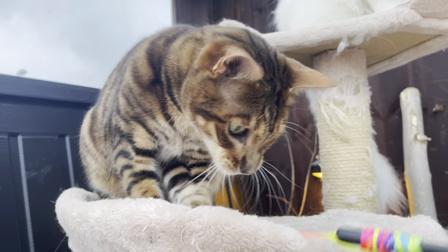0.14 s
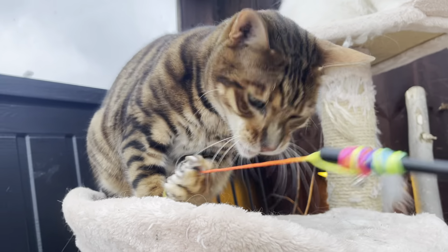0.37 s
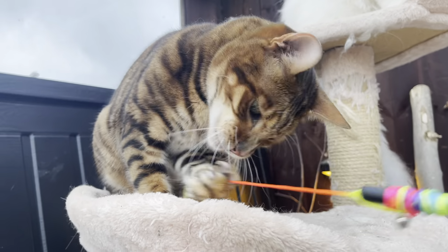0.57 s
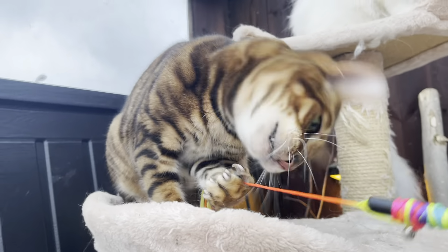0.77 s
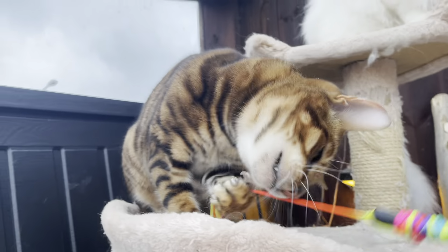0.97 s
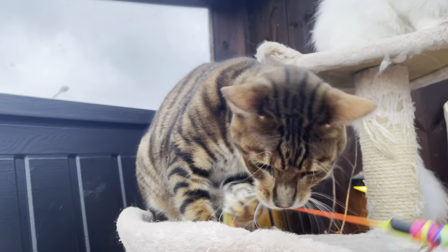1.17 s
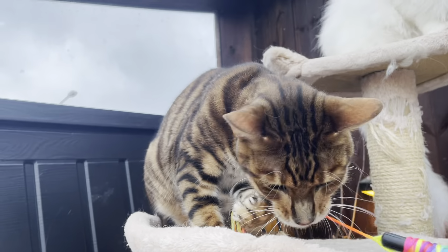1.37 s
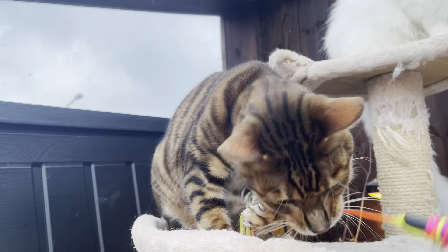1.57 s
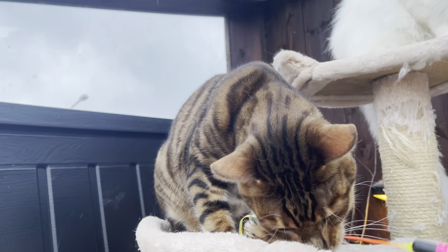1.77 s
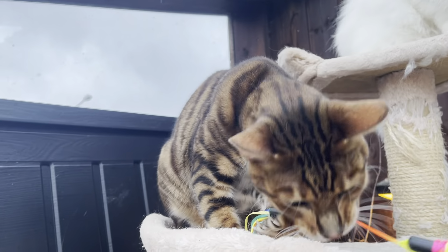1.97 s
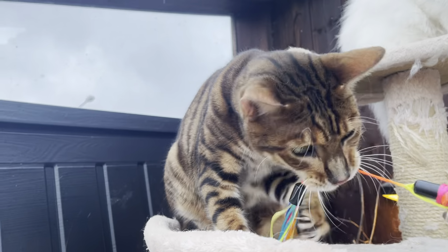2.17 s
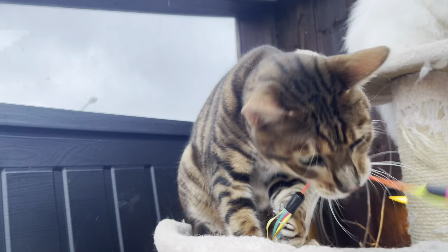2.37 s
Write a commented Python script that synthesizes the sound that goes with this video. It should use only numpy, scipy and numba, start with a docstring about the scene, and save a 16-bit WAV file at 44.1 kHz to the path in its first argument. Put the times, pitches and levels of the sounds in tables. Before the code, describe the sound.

A small jingle bell on a cat toy, close and outdoors. Only quiet traffic wash, low hum and faint hiss until about 0.2 s, when a soft paw rustle brings the first weak tinkles. From 0.43 s bright, irregular, rapid metallic jingling runs to the end at 2.4 s, with sharp clicks near 0.53 and 2.1 s and a faint dull thump at 0.6 s. Very high ringing, short shimmering tails, no obvious echo.

```python
"""Distant traffic with a low hum and a faint narrow hiss is heard first, a broad wash of filtered noise. Then a
small jingle bell on a cat's wand toy is shaken close to a phone outdoors: its loose pellet knocks and rolls
inside the shell, driving decaying resonators (clear modes) and decaying noise (a bright shimmer). Short noise
bursts add dry cracks as the bell snaps against the wand; a soft rustle and one dull thump come from a paw
grabbing the toy."""
import sys
import numpy as np
from scipy import signal
from scipy.fft import rfft, irfft
from scipy.io import wavfile
from scipy.ndimage import uniform_filter1d
from numba import njit

SR = 44100
rng = np.random.default_rng(int(sys.argv[2]) if len(sys.argv) > 2 else 0)


def bounce(signal):
    """Save signal as a 16-bit WAV file at the path given by the first command-line argument."""
    frames = np.transpose(np.atleast_2d(signal))
    limited = np.clip(frames, -1, 1)
    pcm = np.round(limited * 32767).astype(np.int16)
    wavfile.write(sys.argv[1], SR, pcm)


N = 107471

# pellet knocks, drives before the gains of modes and shimmer:
# (time [s], shimmer and high modes [dB], lower modes [dB], upper modes [dB])
KNOCKS = [(0.1252, -48.5, -80, -60), (0.1927, -48.5, -77, -65), (0.2281, -32, -41, -54),
          (0.26, -34.5, -43, -36.5), (0.2875, -25, -36, -45), (0.295, -23, -35, -46),
          (0.3259, -42, -47, -55), (0.3327, -29, -40, -54), (0.3416, -20, -32, -35),
          (0.3515, -42, -58, -37), (0.4076, -37, -43, -60), (0.4277, -11.5, -23, -44),
          (0.4351, -16, -17, -41), (0.4378, -28, -27, -40), (0.4462, -19.5, -32, -41),
          (0.453, -28, -32, -46), (0.4763, -30, -39, -55), (0.4826, -18.5, -37, -50),
          (0.4877, -18.5, -32, -34), (0.4923, -21, -31.5, -40), (0.502, -37, -24.5, -42),
          (0.5229, -32, -33, -29), (0.5274, -11, -30.5, -31), (0.5322, -23, -32, -42),
          (0.5381, -24, -43, -45), (0.5585, -25, -33, -34), (0.571, -13.5, -26.5, -40),
          (0.579, -21, -27, -48), (0.6071, -21.5, -35, -45), (0.6117, -16, -51, -39),
          (0.6145, -27, -32.5, -38), (0.6509, -25, -46, -33), (0.6567, -28, -45, -27),
          (0.6691, -25, -39, -30.5), (0.6756, -29, -34, -42), (0.7094, -23.5, -29, -42),
          (0.7578, -31, -53, -37.5), (0.775, -26, -32, -42), (0.7846, -25, -38, -37),
          (0.7911, -37, -42, -54), (0.8327, -19, -78, -35.5), (0.895, -33, -56, -43),
          (0.903, -21, -29, -33), (0.9145, -17.5, -28.5, -23.5), (0.9204, -38, -41, -52),
          (0.9688, -20.5, -33.5, -31.5), (0.9833, -24, -44, -44), (1.0249, -25.5, -67, -47),
          (1.0694, -29, -59, -46), (1.075, -27.5, -45, -33), (1.081, -31, -56, -34),
          (1.0865, -23.5, -40, -45), (1.1416, -24, -36, -31), (1.1599, -21, -45, -29.5),
          (1.1843, -33, -51, -43), (1.196, -23, -58, -28), (1.202, -24, -58, -37),
          (1.2704, -23.5, -33.5, -44), (1.277, -24, -40, -35), (1.2829, -23, -53, -29.5),
          (1.3153, -26.5, -49, -53), (1.3269, -24, -53, -35), (1.3328, -20.5, -57, -34),
          (1.383, -25, -41, -41), (1.3875, -22, -32.5, -31), (1.437, -39, -41, -37),
          (1.4426, -20.5, -39, -31), (1.4909, -50, -54, -38), (1.4978, -24, -33, -33),
          (1.5159, -25.5, -55, -42), (1.536, -25.5, -54, -58), (1.5624, -20, -34, -29.5),
          (1.57, -26, -42, -43), (1.632, -17, -19.5, -32), (1.6367, -21.5, -28, -23),
          (1.6604, -37, -35, -47), (1.67, -35, -39, -41), (1.6804, -24.5, -34, -29),
          (1.7092, -35, -45, -40), (1.7472, -22, -34, -44), (1.753, -23, -28, -29), (1.7981, -30, -50, -34),
          (1.8117, -26, -47, -29), (1.8512, -40, -35.5, -33.5), (1.867, -26.5, -35, -39),
          (1.8736, -22, -36, -61), (1.913, -44, -44, -33.5), (1.9194, -24, -36, -33.5),
          (1.9322, -32, -40, -39), (1.9398, -29.5, -35.5, -44), (1.9956, -20.5, -29.5, -40),
          (2.0046, -18.5, -27.5, -30), (2.028, -28, -44, -31), (2.0413, -22.5, -40, -37),
          (2.1012, -7.5, -29, -22), (2.1482, -24.5, -34, -44), (2.151, -24, -46, -20.5),
          (2.1552, -26, -31, -39), (2.1749, -24, -31.5, -48), (2.1924, -25.5, -29, -46),
          (2.201, -18, -31.5, -34), (2.2482, -28.5, -33.5, -32), (2.2678, -29.5, -52, -54),
          (2.2892, -26, -33.5, -48), (2.2957, -30, -41, -36), (2.3342, -21, -30.5, -27.5),
          (2.3507, -34, -42, -37), (2.363, -24.5, -35, -39), (2.4065, -30, -38, -42),
          (2.419, -26, -54, -51), (2.4311, -22, -35, -44)]


def bell():
    """Superposition: one train of impacts excites the modes and the shimmer; dry cracks add on top."""
    rows = np.array(KNOCKS)
    at = np.clip((rows[:, 0] * SR).astype(int), 0, N - 1)
    taps = rolling(at, rows[:, 1])
    return clear_modes(rows, at, taps) + shimmer(rows, at, taps) + cracks()


# how hard the pellet rolls between knocks: (time [s], level [dB])
ROLL = [(0.18, -59), (0.24, -55), (0.4, -51.5), (0.46, -55), (0.51, -47), (0.68, -42), (0.82, -52),
        (0.9, -42), (1.14, -40), (1.43, -42.5), (2.06, -41.5), (2.37, -50.5), (2.43, -30.5)]
TAPS_PER_S, TAP_SPREAD_DB = 650, 5.5
BOUNCE_DB, BOUNCE_T60_S = -14, 0.079  # small rebounds, relative to their knock
FLIGHT_S, FLIGHT_DB = .026, -0.4  # change of rolling before a knock, per dB of knock above the rolling


def rolling(at, knock_db):
    """Random impact process: taps of steady rolling, weaker in flight before a knock, and rebounds after it."""
    t = np.arange(N) / SR
    roll_db = read(ROLL, t)
    following = np.clip(np.searchsorted(at, np.arange(N)), 0, len(at) - 1)
    in_flight = at[following] - np.arange(N) < FLIGHT_S * SR
    excess_db = np.clip(knock_db[following] - roll_db, 0, 30)
    roll_power = undb(2 * (roll_db + FLIGHT_DB * in_flight * excess_db)) * (t > ROLL[0][0])

    knock_power = np.zeros(N)
    knock_power[at] = undb(knock_db) ** 2
    bounce_power = undb(2 * BOUNCE_DB) * decay(knock_power, BOUNCE_T60_S / 2)  # power falls twice as fast in dB
    level = np.sqrt(roll_power + bounce_power)

    tapped = rng.random(N) < TAPS_PER_S / SR
    tap_db = TAP_SPREAD_DB * (np.minimum(rng.exponential(size=N), 2.8) - 2)
    return tapped * level * undb(tap_db)


# resonances of the shell, levels relative to their drive: (frequency [Hz], level [dB], t60 [s])
LOWER = [(7840, -20, 0.21), (7883, -2.5, 0.066), (7878, -14, 0.15)]
UPPER = [(8384, -1.5, 0.082), (8364, -13, 0.042)]
HIGH = [(8830, -33, 0.066), (10800, -31.5, 0.18), (11216, -35.5, 0.026), (11460, -25.5, 0.065)]
ROLL_RING_DB = -3  # tap strength in the modes
DETUNE, MODE_SCATTER_DB = 0.002, 2.5  # standard deviations: pitch as a fraction, and level, per knock
RING_LEFT = 0.15  # share of the old ring's amplitude that a knock leaves
RING_BAND_HZ = 7250, 11900


def clear_modes(rows, at, taps):
    """Modal synthesis: each natural frequency of the shell rings and decays after every impact."""
    last = np.clip(np.searchsorted(at, np.arange(N), side="right") - 1, 0, None)  # latest knock
    rings = np.zeros(N)
    for column, family in ((2, LOWER), (3, UPPER), (1, HIGH)):
        for hz, db, t60 in family:
            level_chance, pitch_chance = rng.standard_normal((2, len(at)))
            hits = taps * undb(ROLL_RING_DB) * np.exp(2j * np.pi * rng.random(N))
            hits[at] += undb(rows[:, column] + MODE_SCATTER_DB * level_chance)
            bend = DETUNE * pitch_chance[last]
            fade = np.exp(-np.log(1000) / (t60 * SR))
            rings = rings + undb(db) * ring(hits, bend, 1. * hz, fade, RING_LEFT)
    return signal.sosfilt(signal.butter(6, RING_BAND_HZ, "band", fs=SR, output="sos"), rings)


@njit
def ring(hits, bend, hz, fade, left):
    """Damped resonator as a turning phasor; each knock mutes the old ring and shifts the pitch slightly."""
    y, phasor, step = np.empty(len(hits)), 0j, 0j
    for i in range(len(hits)):
        if i == 0 or bend[i] != bend[i - 1]:
            step = fade * np.exp(2j * np.pi * hz * (1 + bend[i]) / SR)
            phasor = phasor * left
        phasor = phasor * step + hits[i]
        y[i] = phasor.imag
    return y


# colour of the shimmer, relative: (frequency [Hz], level [dB])
SHIMMER = [(3000, -47), (5000, -38), (7000, -33.5), (7800, -6.5), (8800, -7), (10300, 1), (11200, -3),
           (12000, -18.5), (13000, -33), (13600, -64), (16400, -79)]
SHIMMER_DB = 1.5  # gain of the whole shimmer
TICK_DB, TICK_T60_S = 8.5, .005  # gain of the bare impulse; decay of the noise tick
TAIL_DB, TAIL_T60_S = -14.5, 0.089  # longer tail, relative to the noise tick


def shimmer(rows, at, taps):
    """Dense modes act as noise: each impact gives an impulse and noise with a double exponential decay."""
    power = taps ** 2
    power[at] += undb(rows[:, 1]) ** 2
    tick = decay(power, TICK_T60_S / 2)
    tail = undb(2 * TAIL_DB) * decay(power, TAIL_T60_S / 2)
    noise = np.sqrt(tick + tail) * rng.standard_normal(N)
    return undb(SHIMMER_DB) * tint(undb(TICK_DB) * np.sqrt(power) + noise, SHIMMER)


# dry broadband cracks as the bell snaps against the wand, drive before colouring: (time [s], level [dB])
CRACKS = [(0.2876, -41), (0.4276, -42.5), (0.5274, -31), (0.5585, -44), (1.3825, -45), (1.6325, -51),
          (1.9958, -47), (2.1016, -34), (2.3342, -49)]
# colour of a crack, relative: (frequency [Hz], level [dB])
CRACK_COLOUR = [(3400, -45), (4100, -8), (6000, 0), (12500, -10), (13700, -22), (15500, -17), (16500, -34)]


def cracks():
    """Heavily damped impact: a broad noise burst dies away before any pitch can form."""
    hits = np.zeros(N)
    for s, db in CRACKS:
        hits[int(s * SR)] = undb(db)
    return tint(decay(hits, 0.002) * rng.standard_normal(N), CRACK_COLOUR)  # t60 of 2 ms


BELL_PAN_DB, BELL_LOOSE_DB = .4, -20  # left over right; scattered sound at the right port


def bell_at_ports():
    """Path difference: the bell reaches two ports with unlike phase, and the right one with some scatter."""
    direct = bell()
    smear = rng.standard_normal(400) * np.exp(-np.arange(400) / 90.)  # decays by 1/e in 90 samples
    loose = signal.fftconvolve(direct, unit(smear) / 20)[:N]  # 400 taps of rms 1/20: unit energy
    return ports(direct, rfft(direct + undb(BELL_LOOSE_DB) * loose), BELL_PAN_DB)


# widths are where the envelope or band has fallen to 1/e
RUSTLE_S, RUSTLE_WIDTH_S, RUSTLE_HZ, RUSTLE_BAND_HZ, RUSTLE_DB = 0.22, 0.045, 4540, 3500, -66.5
THUMP_S, THUMP_WIDTH_S, THUMP_HZ, THUMP_DB = .604, .006, 90, -44


def paw():
    """Friction as band noise of uneven level when the toy is grabbed; a thump as a windowed low sine."""
    t = np.arange(N) / SR
    rustle = band_noise(RUSTLE_HZ, RUSTLE_BAND_HZ) * undb(RUSTLE_DB + 2.3 * walk(143))
    rustle = rustle * np.exp(-((t - RUSTLE_S) / RUSTLE_WIDTH_S) ** 2)
    thump = undb(THUMP_DB) * np.sin(2 * np.pi * THUMP_HZ * (t - THUMP_S))
    return rustle + thump * np.exp(-((t - THUMP_S) / THUMP_WIDTH_S) ** 2)


# colour of the wash, relative spectrum: (frequency [Hz], level [dB])
AIR = [(20, -30), (35, -6), (50, -6), (62, -3), (80, -8), (120, -15), (220, -16), (400, -18), (620, -16),
       (1000, -19), (1450, -21), (2500, -30), (4000, -37), (6500, -42), (11500, -42), (13000, -62),
       (16000, -80)]
# level of the wash before its wavering: (time [s], rms level [dB])
AIR_DB = [(0, -55.5), (.15, -56), (.4, -52), (1.2, -52), (2.44, -52.5)]
# likeness of the wash at the two ports: (frequency [Hz], correlation [0-1])
LIKENESS = [(30, .97), (130, .86), (280, .7), (590, .24), (1270, .0), (2730, .15), (5000, .5), (9000, .9)]
# balance of the wash: (frequency [Hz], left over right [dB])
AIR_PAN = [(30, 1), (500, .5), (1200, 2.8), (4000, 1), (12000, 0)]
FLICKER_DB = 1.52  # scale of the random wavering


def traffic():
    """Diffuse field: coloured noise that wavers slowly, partly coherent between the two ports."""
    f, t = np.fft.rfftfreq(N, 1 / SR), np.arange(N) / SR
    colour = undb(read(AIR, f, log=True))
    a, b = (rfft(rng.standard_normal(N)) * colour for _ in range(2))
    like = np.clip(read(LIKENESS, f, log=True), 0, 1)
    right = like * a + np.sqrt(1 - like ** 2) * b
    wash = ports(irfft(a, N), right, read(AIR_PAN, f, log=True))
    return unit(wash) * undb(read(AIR_DB, t) + FLICKER_DB * walk(3.17))


def hum():
    """Narrow-band noise: a bandwidth of a few hertz makes a low tone beat at random."""
    return band_noise(62, 6) * undb(-63)


# level of the narrow hiss: (time [s], level [dB])
HISS = [(0, -76), (.2, -73.5), (.45, -92), (.7, -71.5), (1.2, -75.5), (1.6, -88), (2.44, -79)]


def hiss():
    """Band-limited noise: a narrow band is heard as a faint hiss with a hint of pitch."""
    return band_noise(5750, 380) * undb(read(HISS, np.arange(N) / SR))


# phase by which the left port leads: (frequency [Hz], phase [rad])
PORT_PHASE = [(0, 0), (3000, .5), (6500, .6), (7300, 1.0), (8000, .9), (8750, -.35), (10250, -3.14),
              (11750, -5.85), (13500, -9.0), (17000, -15.3)]


def ports(left, right_spectrum, pan_db):
    """Two-point reception: phase and level differences by frequency, split evenly over the ports."""
    phase = read(PORT_PHASE, np.fft.rfftfreq(N, 1 / SR))
    turn = np.exp(.5j * phase) * undb(pan_db / 2)
    return np.array([irfft(rfft(left) * turn, N), irfft(right_spectrum / turn, N)])


def undb(db):
    """Logarithmic level: decibels to amplitude gain."""
    return 10 ** (np.asarray(db) / 20)


def read(table, at, log=False):
    """Linear interpolation between the rows of a two-column table, on a log axis if asked."""
    x, y = np.array(table, float).T
    return np.interp(np.log(at + 1), np.log(x + 1), y) if log else np.interp(at, x, y)


def unit(x):
    """Normalisation by energy: scale to rms 1."""
    return x / np.sqrt(np.mean(x ** 2))


def walk(rate):
    """Slow modulation: random values held for 1 / rate seconds, smoothed by two moving averages."""
    k = int(SR / rate)
    held = np.repeat(rng.standard_normal(N // k + 1), k)
    return 1.3 * uniform_filter1d(uniform_filter1d(held, k), k)[:N]


def decay(x, t60):
    """Exponential damping: every impulse gains a tail that falls to a thousandth in t60 seconds."""
    return signal.lfilter([1], [1, -np.exp(-np.log(1000) / (t60 * SR))], x)


def band_noise(hz, width_hz):
    """Spectral shaping: white noise in a Gaussian band, at rms 1."""
    f = np.fft.rfftfreq(N, 1 / SR)
    band = np.exp(-((f - hz) / width_hz) ** 2)
    return unit(irfft(rfft(rng.standard_normal(N)) * band, N))


def tint(x, table):
    """Linear filtering: colour a sound by a table, with a mean power gain of 1 over frequency."""
    gain = unit(undb(read(table, np.fft.rfftfreq(N, 1 / SR), log=True)))
    return irfft(rfft(x) * gain, N)


def scene():
    """Superposition: bell and traffic differ at the ports; paw, hum and hiss are the same in both."""
    return bell_at_ports() + paw() + traffic() + hum() + hiss()


def record(dry):
    """Band limiting: the phone cuts the top with a steep elliptic low-pass at 16.6 kHz."""
    return signal.sosfilt(signal.ellip(8, .2, 70, 16600, fs=SR, output="sos"), dry)


dry = scene()
out = record(dry)
bounce(out)
```